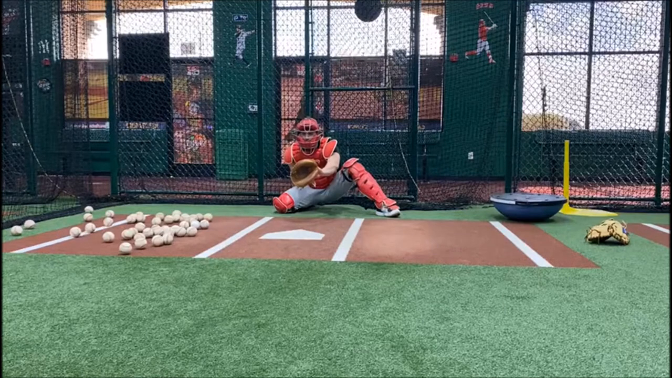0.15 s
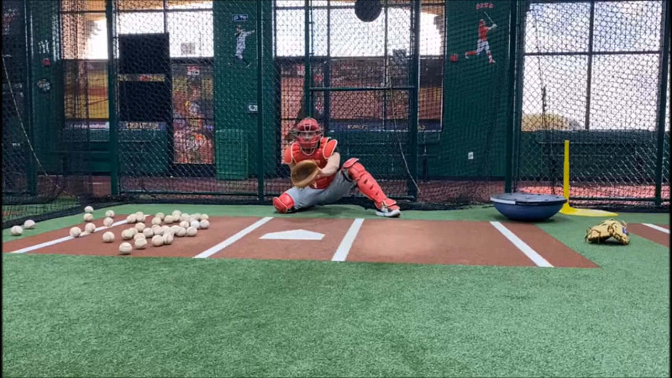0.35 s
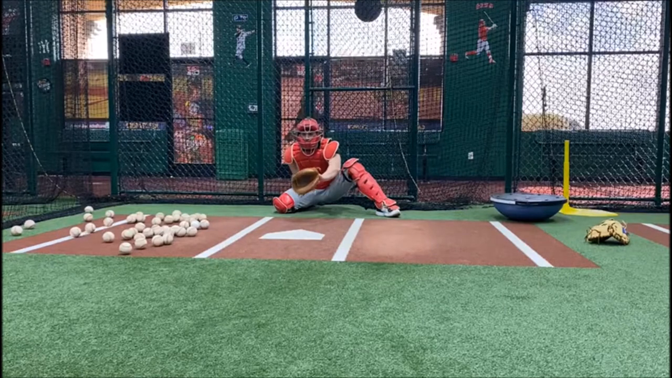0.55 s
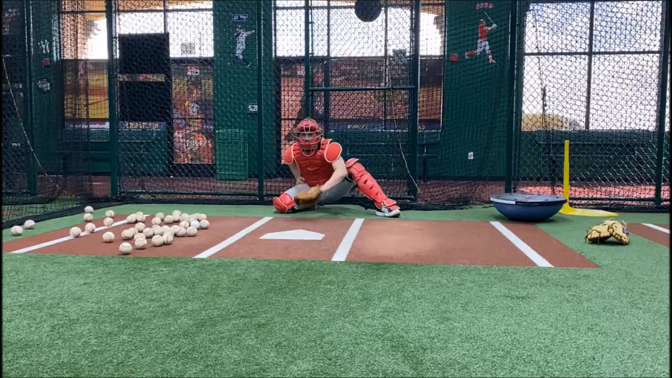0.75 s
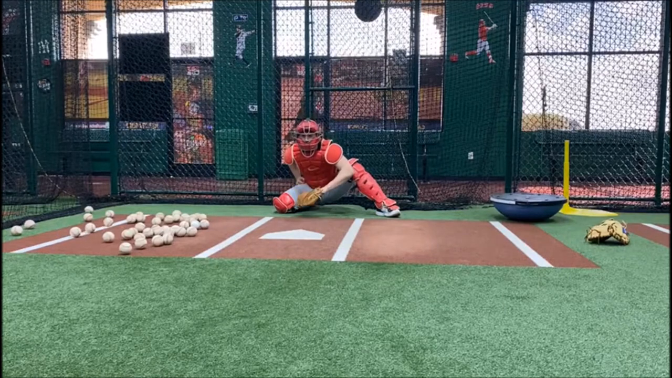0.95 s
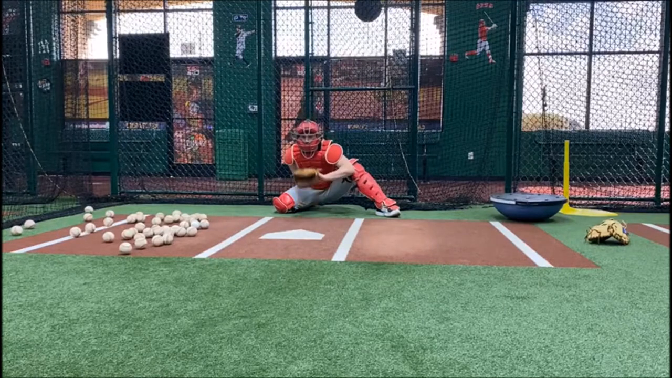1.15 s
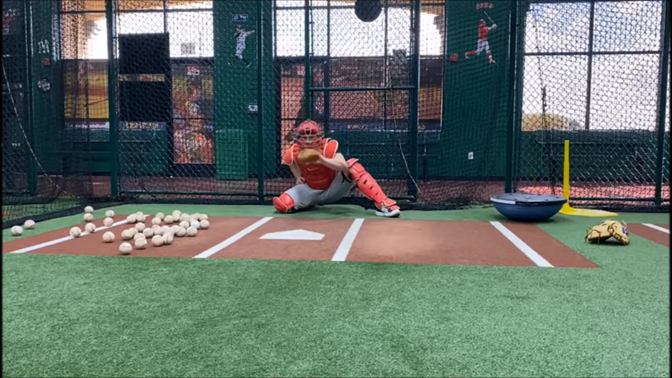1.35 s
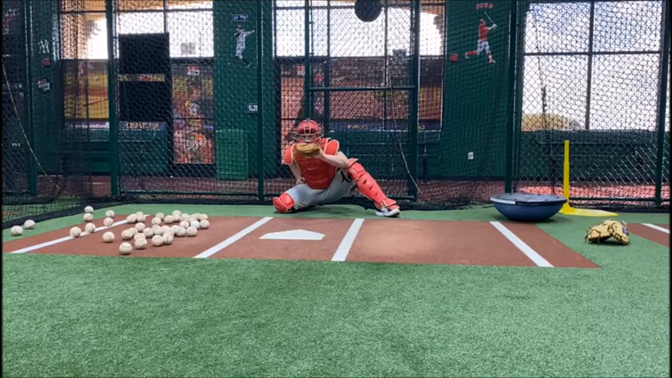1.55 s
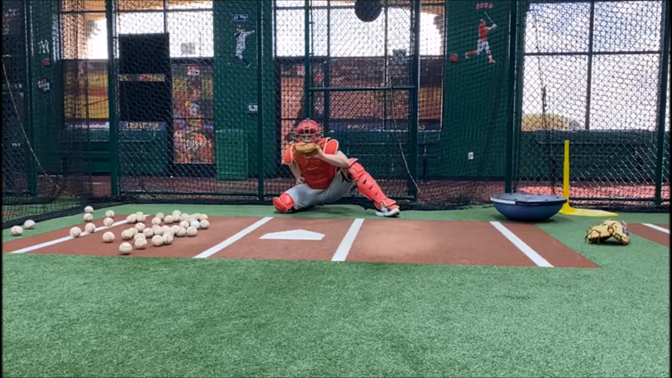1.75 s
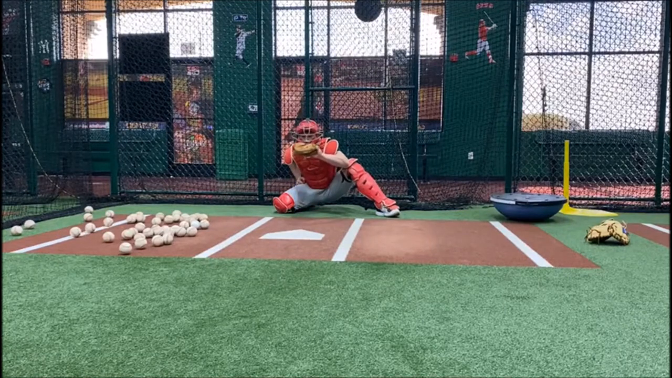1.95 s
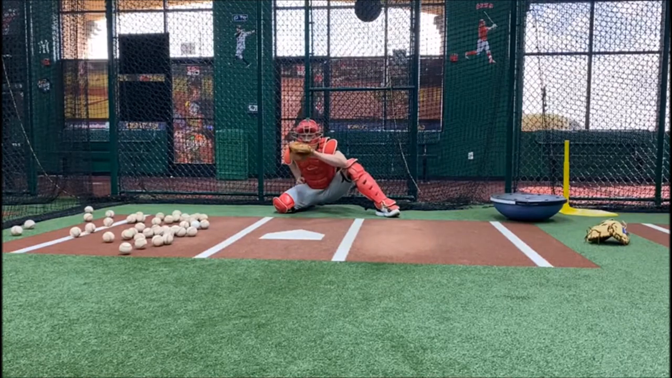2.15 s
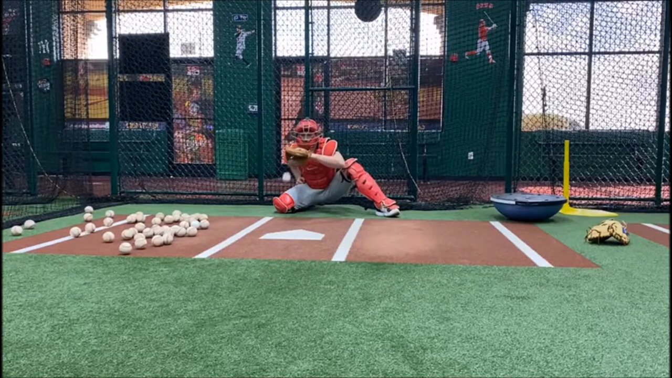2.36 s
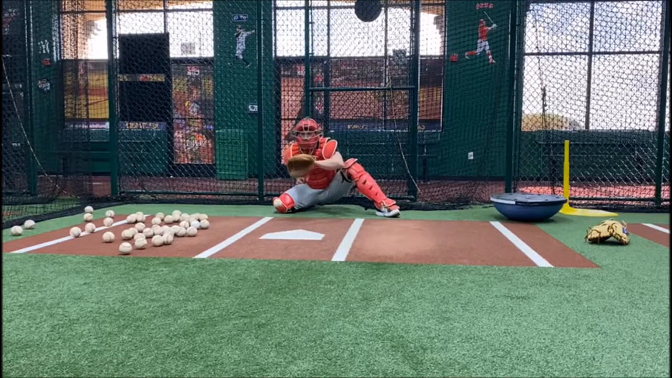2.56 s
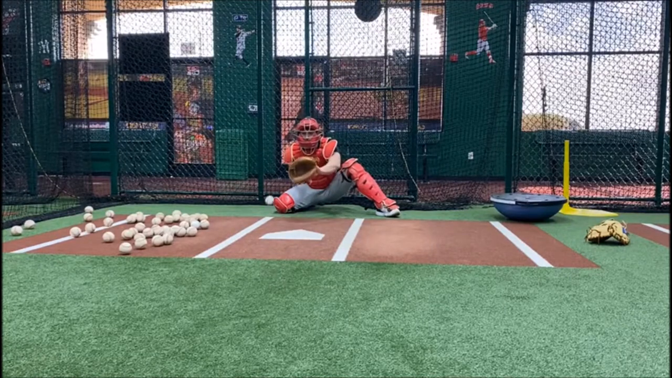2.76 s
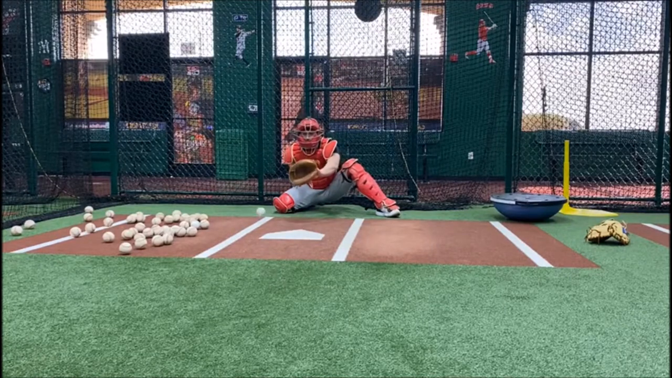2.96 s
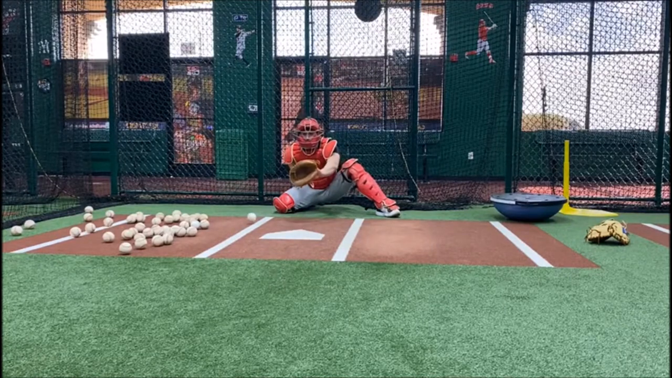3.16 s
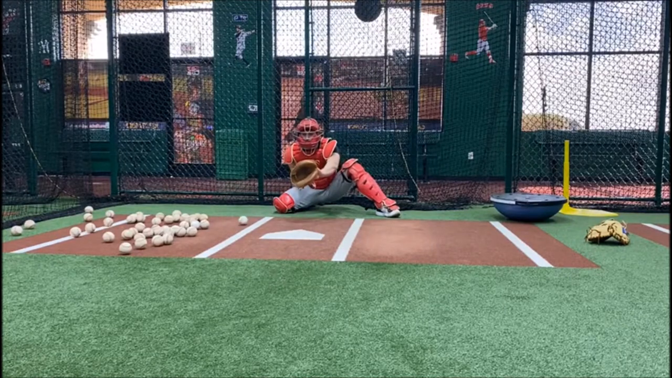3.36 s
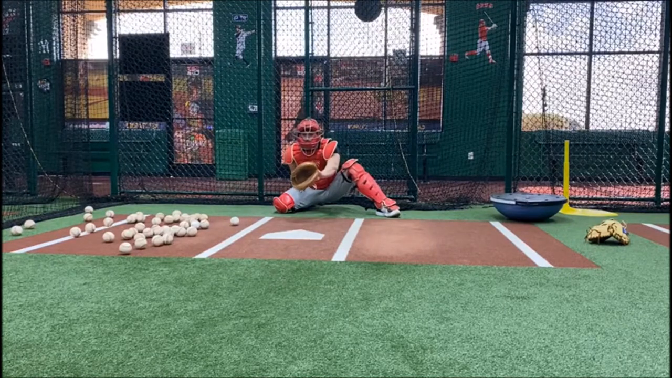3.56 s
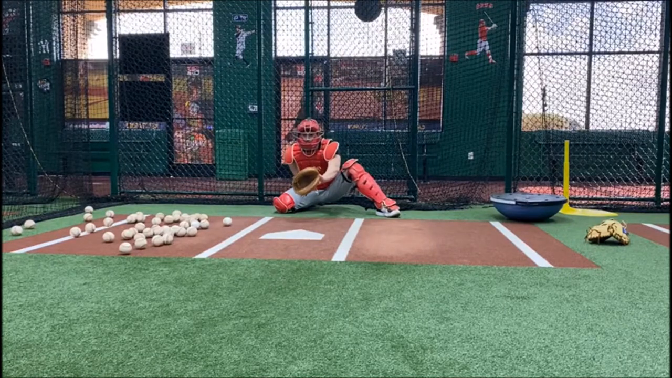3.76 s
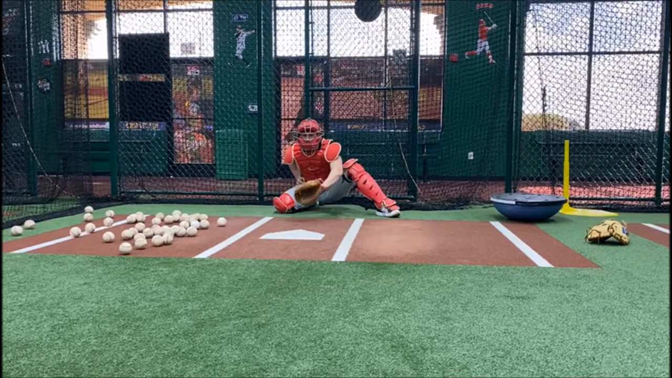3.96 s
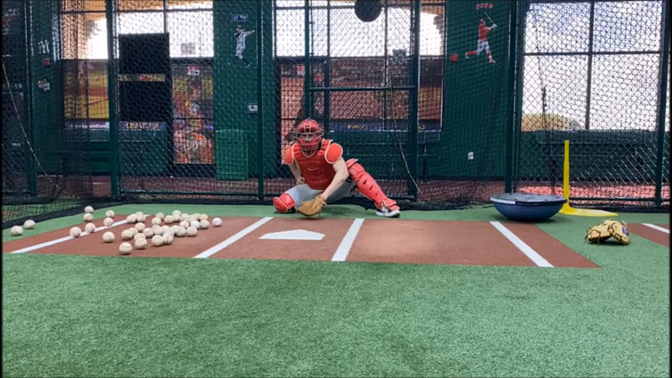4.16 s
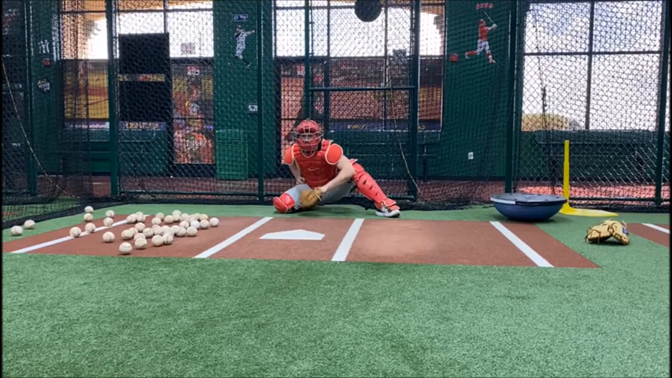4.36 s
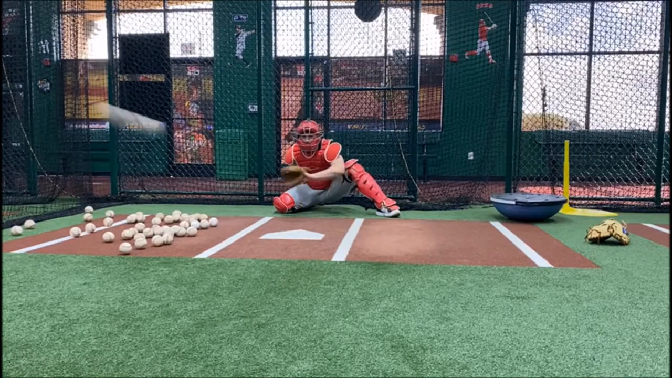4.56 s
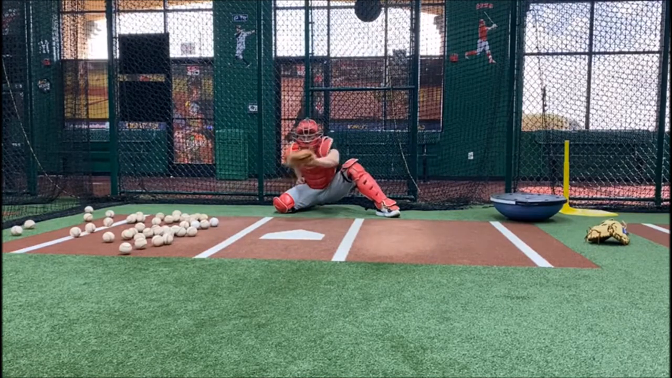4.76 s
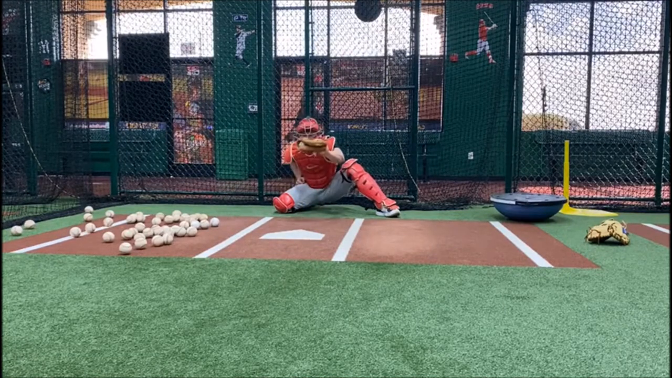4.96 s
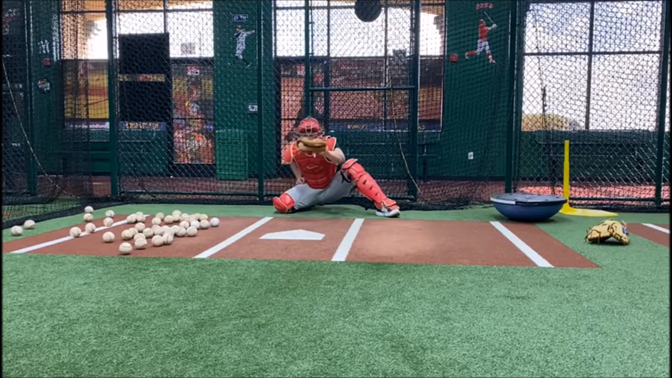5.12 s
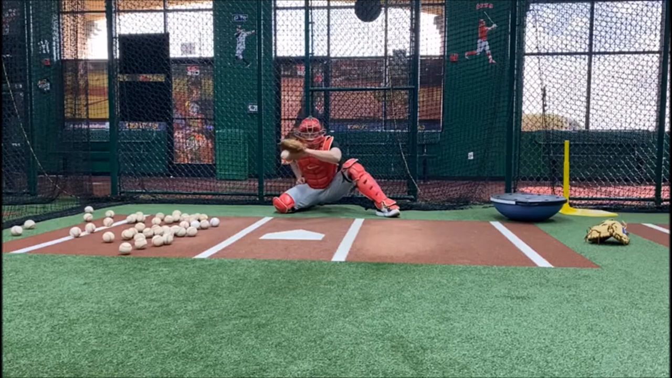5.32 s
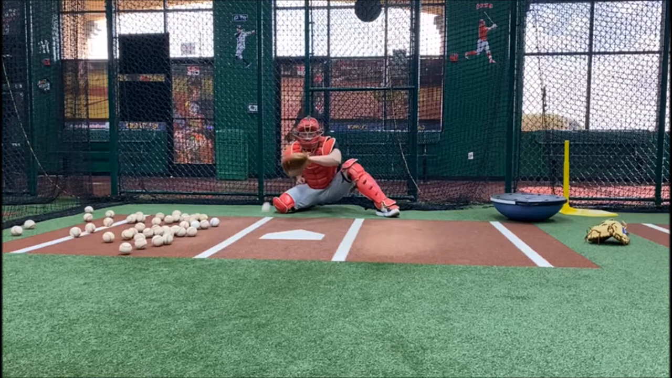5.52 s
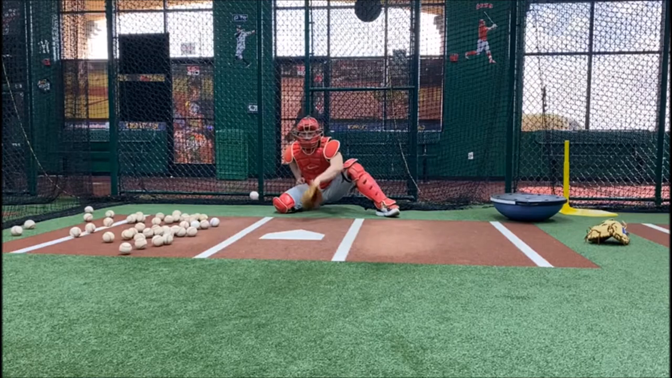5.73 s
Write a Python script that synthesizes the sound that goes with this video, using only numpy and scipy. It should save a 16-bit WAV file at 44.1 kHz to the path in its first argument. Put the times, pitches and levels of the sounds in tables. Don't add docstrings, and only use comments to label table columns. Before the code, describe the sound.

Distant launches boom and echo through a large batting hall, and two baseballs crack sharply into a nearby leather mitt over faint fan hum.

```python
import sys
import numpy as np
from scipy import signal
from scipy.fft import rfft, irfft
from scipy.io import wavfile
from scipy.ndimage import uniform_filter1d

SR = 44100
rng = np.random.default_rng(int(sys.argv[2]) if len(sys.argv) > 2 else 0)


def amplitude_ratio(level_db):
    exponent = np.asarray(level_db, float) / 20
    return 10 ** exponent


def inscribe(sig):
    pcm = np.round(np.clip(np.atleast_2d(sig).T, -1, 1) * 32767)
    wavfile.write(sys.argv[1], SR, pcm.astype(np.int16))


N = 255339

# pitch_hz, level_db (per Hz)
FAN_COLOUR = [(15, -43), (25, -36.5), (49, -1), (77, -0.5), (234, -13), (297, -17.5), (360, -18),
              (446, -21.5), (593, -19.5), (889, -27), (2250, -24.5), (2860, -32), (7400, -40.5),
              (9620, -70), (16300, -120)]
FAN_DB = -53
# pitch_hz, left_minus_right_db
FAN_BALANCE = [(25, 0), (60, 0), (110, 0.0), (190, 1.5), (350, -10.5), (630, 0), (1120, 1), (2020, -0.5),
               (3630, 2.5), (6520, 9), (11700, -2)]
# pitch_hz, level_db
HUM = [(360.7, -55), (538.3, -75.5), (597.5, -68), (721.4, -68.5), (1200, -84), (1443, -74.5)]
HUM_LOAD_S, HUM_RAMP_S, HUM_IDLE_DB = 2.83, .14, -4
# start_s, level_db, decay_s (to -60 dB)
JOLTS = [(-.02, -39, 0.77), (.405, -38, 1.65), (.915, -36, 1.3), (1.05, -42.5, .4)]
JOLT_RISE_S = .0098
WHINE_HZ, WHINE_DB, THROB_HZ = 2300, -70, 28
POST_S, POST_HZ, POST_BEAT_HZ, POST_DB, POST_DECAY_S = 1.49, 51, 4.8, -36, 1.3
# start_s, pitch_hz, level_db
SQUEAKS = [
    [(3.56, 1250, -64), (3.64, 1570, -64.5), (3.71, 1540, -66), (3.77, 1600, -71)],
    [(3.84, 2500, -65), (3.89, 2550, -60), (3.95, 2550, -63), (3.985, 2550, -58), (4.02, 2490, -57),
     (4.03, 2280, -68), (4.042, 2120, -59), (4.06, 1900, -58), (4.078, 1765, -51), (4.1, 1750, -53)],
]
SQUEAK_ECHO_S = .035
# pitch_hz, side_minus_mid_db
WIDE_PORTS = [(25, -30), (60, -21.5), (110, -19.5), (190, -10), (350, -1.5), (630, 3.5), (1120, 1.5),
              (2020, -2), (3630, -0.5), (6520, -0.5), (11700, -0.5)]
# pitch_hz, side_minus_mid_db
NEAR_PORTS = [(60, -23), (110, -31), (190, -33), (350, -20.5), (630, -16), (1120, -12), (2020, -16.5),
              (3630, -1.5), (6520, 1), (11700, -8)]
# pitch_hz, decay_s (to -60 dB)
HALL_DECAY = [(70, 1.53), (200, 1.9), (500, 1.31), (1200, 1.435), (3000, 1.55), (6000, 0.96), (10000, 0.62)]
# pitch_hz, level_db (from the last colour point)
AIR = [(8500, -4), (10000, -9), (11400, -13.5), (12100, -42.5)]
# start_s, level_db, rise_s, hold_s, decay_stretch (times the hall's)
FAR_BLOWS = [
    (-.05, -30, 0.0069, 0.11, 0.37),
    (.1142, -29, 0.00058, 0.063, 1.125),
    (0.905, -18.2, 0.022, 0.023, 0.84),
    (1.41, -41.5, 0.024, 0.31, 0.65),
    (1.561, -38.5, 0.035, 0.12, 1.07),
    (4.2265, -25.2, 0.017, 0.046, 0.8),
    (4.735, -29.5, 0.0037, 0.019, 0.94),
    (5.029, -39, 0.011, 0.055, 1.04),
    (5.625, -45.5, 0.0034, 0.045, 0.91),
]
# pitch_hz, fill_s, left_minus_right_db, treble_delay_s
GAPS = [(1000, .1, 2, .001), (1250, .07, 2.5, .0003), (3600, .075, -.9, .009), (3300, .05, .2, .003),
        (1000, .02, .6, .003), (3400, .065, 1.2, .011), (3000, .005, 1.2, .0005), (3250, .03, 1.2, .001),
        (1000, .02, -.8, .001)]
GAP_WIDTH, TREBLE_HZ = .16, 2500
# pitch_hz, level_db (per Hz)
THUD = [(24, -48), (40, -15), (181, 4.5), (562, -18.5), (747, -58), (889, -39), (1440, -32), (7400, -56),
        (9620, -89), (16300, -120)]
BAT = [(24, -42), (40, -11), (92, -5.5), (162, 1.5), (515, -9.5), (670, -2.5), (731, -13.5), (1380, -12),
       (1950, -10.5), (7400, -20.5), (9620, -56), (16300, -120)]
LAUNCH_1 = [(24, -49.5), (40, -14.5), (80, -13.5), (292, -5), (414, -5.5), (493, -7.5), (851, -8.5),
            (1110, -7), (1210, -8), (1470, -6.5), (3840, -16.5), (7400, -18.5), (9620, -51), (16300, -120)]
NET = [(41, -43.5), (70, -15.5), (80, -25), (114, -7), (269, -1), (713, -18), (2120, -10), (5310, -14.5),
       (7400, -26.5), (9620, -57), (16300, -120)]
LAUNCH_2 = [(24, -49), (40, -12), (145, -6), (405, -4), (442, -17), (575, -3), (851, -9.5), (1110, -6.5),
            (1210, -9.5), (1380, -7.5), (3600, -18), (7400, -19.5), (9620, -51), (16300, -120)]
MITT_TAIL = [(24, -37), (40, -21), (71, -4), (220, -1.5), (256, -3), (575, -6.5), (2000, -12.5),
             (5690, -21), (7400, -22), (9620, -58), (16300, -120)]
RATTLE = [(24, -54), (40, -30), (75, -21), (452, -4), (797, -15), (971, -15), (1260, -11.5), (2130, -6.5),
          (4290, -14), (7400, -30), (9620, -60), (16300, -120)]
DROP = [(24, -27), (40, 0), (326, -8), (355, -10), (731, -27), (780, -30), (833, -26.5), (2330, -17),
        (7400, -26), (9620, -58), (16300, -120)]
# start_s, pitch_hz, level_db, hold_s, decay_s
RINGS = [(-.02, 186, -51, 0.13, 0.6), (0.553, 183, -50.5, 0.35, 0.27), (0.501, 380, -50.5, 0.34, 0.43),
         (.88, 198, -34.5, 0.045, 0.31), (0.9045, 1512, -28, 0.05, 0.28), (0.978, 1110, -27, 0.0086, 0.47),
         (0.932, 512, -28, 0.056, 1.3), (4.23, 1380, -30, 0.015, 0.78), (4.232, 2040, -36, 0.041, 0.32),
         (4.261, 436, -36, 0.23, 1.3), (4.739, 810, -27, 0.0067, 0.25), (5.067, 920, -50.5, 0.047, 0.425),
         (.913, 5800, -31, .06, .35), (4.238, 5800, -36, .06, .3)]
# start_s, pitch_hz, level_db, hold_s, decay_s
MORE_RINGS = [(.91, 800, -30, .04, .3), (.97, 275, -34, .1, .6), (2.546, 330, -47, .01, .35),
              (2.546, 480, -56, .005, .2), (4.3, 520, -39, .08, .7), (4.76, 760, -37, .03, .2),
              (5.618, 320, -46, .01, .4), (5.618, 480, -51, .005, .2)]
RING_SPREAD = .14
# start_s, peak_db, pitch_hz, cycles
ECHOES = [(.062, -26, 185, 6), (.115, -25, 650, 3), (.133, -25, 600, 4), (.147, -30, 1900, 8),
          (.188, -28, 2050, 8), (.221, -29, 1850, 10), (.323, -33, 600, 5), (.907, -24, 1340, 6),
          (.912, -19, 1850, 6), (.925, -16, 1150, 9), (.935, -17, 1420, 9), (.972, -19, 1500, 16),
          (.984, -19, 520, 3), (.986, -17, 1130, 16), (.996, -22, 520, 5), (1.003, -22, 2950, 8),
          (1.048, -25, 560, 7), (1.058, -20, 520, 2), (1.501, -37, 912, 4), (1.6, -35, 221, 2),
          (1.665, -31, 245, 2), (1.537, -36, 1600, 3), (4.07, -57, 2450, 20), (4.229, -35, 1370, 6),
          (4.247, -29, 2250, 14), (4.262, -26, 2300, 12), (4.266, -23, 1200, 9), (4.271, -24, 450, 2),
          (4.304, -24, 1600, 10), (4.313, -22, 1250, 8), (4.316, -26, 580, 7), (4.348, -27, 420, 6),
          (4.448, -27, 1360, 5), (4.862, -26, 420, 4), (4.89, -27, 620, 5), (4.924, -28, 480, 3),
          (5.026, -33, 544, 1.5), (5.031, -33, 2330, 4), (5.076, -30, 380, 5), (5.11, -33, 400, 3),
          (5.078, -36, 2300, 8), (5.278, -38, 1900, 10)]
# start_s, peak_db, pitch_hz, cycles
KNOCKS = [(0.05, -25.5, 255, 4.3), (0.189, -23, 700, 3), (0.209, -23, 660, 6.5), (1.369, -25, 440, 1),
          (1.392, -26.5, 243, 2.4), (1.432, -30.5, 387, 1.8), (1.531, -37, 1086, 9.24),
          (1.567, -33, 418, 3.3), (1.645, -32.5, 282, 2.4), (2.545, -30, 271, 1.34),
          (2.932, -41, 319, 1.37), (4.757, -12.5, 577, 1.9), (4.766, -25.5, 574, 3.8), (4.8, -45, 145, 2.1),
          (4.856, -23.5, 630, 5.1), (4.895, -21, 527, 2), (4.923, -32, 227, 4.1), (4.973, -26, 377, 2.2),
          (4.998, -31.5, 316, 0.88), (5.617, -29, 266, 1.96)]
# start_s, peak_db, pitch_hz, cycles
TICKS = [(.914, -28, 1570, 2.7), (.918, -12, 1420, 9), (.938, -14, 1120, 7), (.984, -13, 1070, 3.5),
         (.994, -17, 1164, 6.9), (1.002, -15, 1050, 2), (4.237, -21, 1440, 8.3), (4.263, -22, 1250, 5.7),
         (4.273, -20, 1230, 3.1), (4.751, -19, 990, 4.1), (4.79, -23, 900, 4), (4.815, -34, 707, 3.3),
         (.115, -26, 2100, 6), (.123, -24, 2250, 11), (1.388, -39, 5970, 5), (1.426, -32, 3080, 2.7),
         (1.47, -29, 5700, 4), (1.584, -25, 5670, 3), (1.665, -29, 2570, 4), (2.545, -47.5, 2930, 2.7),
         (4.7343, -27, 4730, 3), (4.7315, -14.5, 675, 1.7), (5.032, -35, 4400, 4.4), (5.62, -40, 2160, 4.5)]
# start_s, peak_db, pitch_hz, cycles
GEAR = [(.058, -24, 179.5, 8), (.114, -26, 10200, 7), (.124, -27, 10200, 15), (.152, -25, 7000, 6),
        (.438, -32, 2070, 8), (1.381, -24, 76, 2.8), (1.426, -38, 9600, 8), (1.479, -31, 6000, 2.5),
        (4.7232, -20, 850, 2.1), (4.7345, -28.5, 10400, 8), (4.738, -16.5, 227, 1.1),
        (4.768, -22, 910, 1.5), (5.031, -43, 7500, 3.6), (5.075, -35, 990, 8.6)]
# start_s, rasp_db, swell_s, afterglow (0-1), snap_db
CRACKS = [
    (1.4, -12.5, 0.0015, 0, -2),
    (4.7269, -10, 0.0015, 0.29, -21.5),
]
# pitch_hz, level_db (per Hz)
CRACK_COLOURS = [
    [(590, -34.5), (1000, 4.5), (5160, -8.5), (6360, 4), (7680, -13), (9870, 2), (12200, -29.5),
     (15800, -51.5), (22000, -120)],
    [(590, -22), (900, 2), (1400, -7.5), (2200, 6), (4950, -14.5), (6770, -5), (8170, -23.5), (9460, -4.5),
     (12200, -30.5), (22000, -120)],
]
CRACK_LEAD_S, TURF_ECHO_S = .008, .0005
# start_s, peak_db, pitch_hz (at the start), glide_s, fade_s
THUMPS = [
    (1.4008, -9.2, 760, .00112, .012),
    (4.7266, -4.2, 940, .00131, .0082),
]
THUMP_STEEP = 2.1
# pitch_hz, share (0-1 of the time)
MID_DROPS = [(600, 0), (1000, .008), (2600, .008), (2800, .14), (3100, .04), (3900, .18), (4400, .12),
             (4900, .02), (6900, .06), (7700, .55), (8200, .98), (8900, .98), (9200, .2), (10900, .25),
             (11300, .98)]
# pitch_hz, share (0-1 of the time)
SIDE_DROPS = [(1500, 0), (2500, .02), (6000, .02), (7000, .25), (8000, .2), (8900, .3), (9400, .98),
              (10800, .98), (11100, .5), (11700, .6), (12000, .98)]


def shape(x, points):
    hz, db = np.transpose(points)
    axis_hz = np.log(np.fft.rfftfreq(x.shape[-1], 1 / SR) + 1)
    return irfft(rfft(x) * amplitude_ratio(np.interp(axis_hz, np.log(hz), db)), x.shape[-1])


def unit(x):
    return x / np.sqrt(np.mean(x ** 2))


def ports(mid, side, points):
    side = shape(side, points)
    return np.array([mid + side, mid - side])


def walk(rate, size):
    k = int(SR / rate)
    steps = np.repeat(rng.standard_normal(size // k + 1), k)
    return 1.42 * uniform_filter1d(uniform_filter1d(steps, k), k)[:size]


def add(out, s, x):
    i = int(s * SR)
    a, b = max(i, 0), min(i + x.shape[-1], N)
    out[..., a:b] += x[..., a - i:b - i]


def aired(colour):
    *body, last = colour[:-2]
    return body + [last] + [(hz, last[1] + db) for hz, db in AIR]


def fan():
    noise = shape(rng.standard_normal((2, N)), aired(FAN_COLOUR))
    return ports(*noise / np.std(noise[0]), WIDE_PORTS) * amplitude_ratio(FAN_DB + .8 * walk(3.2, N))


def mains_hum():
    t = np.arange(N) / SR
    swell_db = HUM_IDLE_DB * np.clip(.5 - (t - HUM_LOAD_S) / HUM_RAMP_S, 0, 1)
    lag = np.array([[.6], [-.6]])
    out = 0
    for hz, db in HUM:
        gain = np.sqrt(2) * amplitude_ratio(db + swell_db * hz / 360 + .51 * walk(5.5, N))
        out = out + gain * np.sin(2 * np.pi * hz * t + .22 * walk(3.7, N) + lag)
    return out


def slab_rumble():
    level, t = 0, np.arange(N) / SR
    for s, db, decay_s in JOLTS:
        age = np.maximum(t - s, 0)
        level = level + (1 - np.exp(-age / JOLT_RISE_S)) * amplitude_ratio(db - 60 * age / decay_s)
    noise = shape(rng.standard_normal(N), [(30, -33.5), (55, 14.5), (80, 19.5), (130, -10.5), (220, -34)])
    return unit(noise) * level


def hall_floor():
    left, right = fan() + mains_hum()
    left = shape(left, [(hz, db / 2) for hz, db in FAN_BALANCE])
    right = shape(right, [(hz, -db / 2) for hz, db in FAN_BALANCE])
    return np.array([left, right]) + slab_rumble()


def whine():
    colour = [(WHINE_HZ * ratio, db) for ratio, db in ((.85, -40), (.97, -6), (1, 0), (1.03, -6), (1.15, -40))]
    noise = shape(rng.standard_normal((2, N)), colour)
    throb = .5 + .5 * np.sin(2 * np.pi * np.cumsum(THROB_HZ * (1 + .06 * walk(5, N))) / SR)
    return unit(noise) * throb * amplitude_ratio(WHINE_DB + 2.5 * walk(1.5, N))


def post():
    age = np.maximum(np.arange(N) / SR - POST_S, 0)
    phase = 2 * np.pi * np.cumsum(POST_HZ * (1 + .015 * walk(41, N))) / SR
    fade = amplitude_ratio(POST_DB - 60 * age / POST_DECAY_S + .64 * walk(50.2, N))
    return np.sqrt(2) * np.sin(np.pi * POST_BEAT_HZ * age) * fade * np.sin(phase)


def curve(table):
    s, hz, db = np.transpose(table)
    t = np.arange(N) / SR
    gate = np.clip(np.minimum(t - s[0], s[-1] - t) / .025, 0, 1)
    return np.interp(t, s, hz), gate * amplitude_ratio(np.interp(t, s, db))


def tone(table, wobble, lag, patchy_db):
    hz, gain = curve(table)
    phase = 2 * np.pi * np.cumsum(hz * (1 + wobble * walk(41, N))) / SR
    return np.sqrt(2) * gain * amplitude_ratio(patchy_db * walk(50, N)) * np.sin(phase + np.array([[lag], [-lag]]))


def squeak(dry_db=-4, wet_db=-5, decay_s=.4):
    direct = sum(tone(part, .012, .6, 3.5) for part in SQUEAKS)
    t = np.arange(2 ** 14) / SR
    tail = rng.standard_normal((2, len(t))) * amplitude_ratio(-60 * t / decay_s) * np.clip(t / SQUEAK_ECHO_S, 0, 1) ** 2
    tail = tail / np.sqrt(np.sum(tail[0] ** 2))
    echo = signal.fftconvolve(direct, tail, axes=1)[:, :N]
    return amplitude_ratio(dry_db) * direct + amplitude_ratio(wet_db) * echo


def far_blow(colour, db, rise, hold, stretch, size=2 ** 16):
    t = np.arange(size) / SR
    noise = shape(rng.standard_normal((2, size)), aired(colour))
    spectrum = rfft(ports(*noise / np.std(noise[0]), WIDE_PORTS))
    centres = np.log([hz for hz, _ in HALL_DECAY])
    axis_hz = np.log(np.fft.rfftfreq(size, 1 / SR) + 1)
    out = 0
    for k, (_, decay_s) in enumerate(HALL_DECAY):
        share = np.interp(axis_hz, centres, np.arange(len(HALL_DECAY)) == k)
        fade = amplitude_ratio(-60 * np.maximum(t - hold - rise, 0) / (decay_s * stretch))
        out = out + irfft(spectrum * share, size) * fade
    clumps_db = 1.5 * walk(120, size) * np.exp(-t / .25)
    return out * (1 - np.exp(-t / max(rise, 1e-4))) * amplitude_ratio(db + clumps_db)


def gapped(x, hz, fill, pan_db, late):
    t = np.arange(x.shape[-1]) / SR
    edges = ((-GAP_WIDTH, -30), (-GAP_WIDTH / 2, -2), (GAP_WIDTH / 2, -2), (GAP_WIDTH, -30))
    band = shape(x, [(hz * (1 + offset), db) for offset, db in edges])
    x = x - band * np.exp(-(t / fill) ** 2)
    treble = shape(x, [(TREBLE_HZ * .8, -30), (TREBLE_HZ, 0)])
    x = x - treble * np.exp(-(t / late) ** 2)
    return x * (t < 1.4) * amplitude_ratio(pan_db * np.array([[.5], [-.5]]))


def far_ring(hz, db, hold, decay_s, size=2 ** 15):
    width = RING_SPREAD * hz / np.sqrt(decay_s)
    t, rise = np.arange(size) / SR, 1.2 / width
    colour = [(hz / 2, -45), (hz - width, -7), (hz, 0), (hz + width, -7), (2 * hz, -45)]
    noise = shape(rng.standard_normal((2, size)), colour)
    fade_db = -60 * np.maximum(t - hold - rise, 0) / decay_s
    return ports(*noise / np.std(noise[0]), WIDE_PORTS) * (1 - np.exp(-t / rise)) * amplitude_ratio(db + fade_db)


def knocks(table, rough, spread_db):
    out, t = np.zeros((2, N)), np.arange(4096) / SR
    for s, db, hz, cycles in table:
        age = t * hz / cycles * 4
        swell = (age / 2) ** 2 * np.exp(2 - age)
        colour = [(hz / 3, -25), (hz, 0), (1.6 * hz, -8), (5 * hz, -45)]
        grit = unit(shape(rng.standard_normal((2, len(t))), colour))
        pan = amplitude_ratio(spread_db * rng.standard_normal() * np.array([[.5], [-.5]]))
        add(out, s, amplitude_ratio(db) * swell * pan * (np.sin(2 * np.pi * hz * t) + rough * grit))
    return out


def thump(db, hz, glide, fade):
    t = np.arange(2 ** 12) / SR
    phase = 2 * np.pi * hz * glide * np.log(1 + t / glide)
    return -np.sin(phase) * amplitude_ratio(db) * np.exp(-(t / fade) ** THUMP_STEEP)


def crack(colour, rasp_db, swell_s, glow, snap_db):
    t = np.arange(2 ** 12) / SR - CRACK_LEAD_S
    before = np.exp(t / swell_s) * np.clip(3.6 + t / swell_s, 0, 1)
    after = np.exp(-t / .00019) + glow * np.exp(-t / .0036)
    rasp = shape(rng.standard_normal((2, len(t))), colour)
    rasp = ports(*rasp / np.std(rasp[0]), NEAR_PORTS) * np.where(t < 0, before, after) * amplitude_ratio(rasp_db)
    lag = np.array([[0], [.00005]])
    snap = 0
    for shift_s, size in ((TURF_ECHO_S, 1), (0, .85)):
        snap = snap + size * np.exp(-((t + shift_s - lag) / .000028) ** 2)
    snap = shape(snap, [(600, -33.5), (1800, 6.5), (6000, 6.5), (10500, 1.5), (12500, -21)])
    return rasp - snap * amplitude_ratio(snap_db)


def scene():
    out = hall_floor() + whine() + post() + squeak()
    colours = THUD, BAT, LAUNCH_1, NET, NET, LAUNCH_2, MITT_TAIL, RATTLE, DROP
    for (s, *blow), colour, gap in zip(FAR_BLOWS, colours, GAPS):
        add(out, s, gapped(far_blow(colour, *blow), *gap))
    for s, *ring in [*RINGS, *MORE_RINGS]:
        add(out, s, far_ring(*ring))
    out = out + knocks(ECHOES, .4, 3) + knocks(KNOCKS, .29, 1.357)
    out = out + knocks(TICKS, .449, 3) + knocks(GEAR, .31, 1.2)
    for s, *air in THUMPS:
        add(out, s, thump(*air))
    for (s, *leather), colour in zip(CRACKS, CRACK_COLOURS):
        add(out, s - CRACK_LEAD_S, crack(colour, *leather))
    return out


def dropouts(x, table, size=1024, count=128):
    hz, _, z = signal.stft(x, SR, nperseg=size)
    treble = np.sum(np.abs(z[hz > 2000]) ** 2, axis=0) + 1e-12
    jump = np.diff(np.log10(treble), prepend=0) > .6
    blow = uniform_filter1d(jump * 1., size=3) > 0
    chance = np.repeat(rng.random((count, z.shape[1] // 4 + 1)), 4, axis=1)
    chance = np.repeat(chance, len(hz) // count + 1, axis=0)
    share = np.interp(hz, *np.transpose(table))[:, None]
    loud_middle = (hz[:, None] < 6500) & (treble > 4 * np.median(treble))
    share = np.where(loud_middle, 0, share)
    keep = (chance[:len(hz), :z.shape[1]] > share) | blow
    return signal.istft(z * keep, SR, nperseg=size)[1][:N]


def low_pass(x):
    return signal.sosfilt(signal.butter(12, 12310, fs=SR, output="sos"), x)


def record(dry):
    rounded = np.tanh(1.01 * dry) / 1.164
    left, right = shape(rounded, [(11800, 0), (12300, -8), (12900, -40)])
    mid = dropouts((left + right) / 2, MID_DROPS)
    side = dropouts((left - right) / 2, SIDE_DROPS)
    return low_pass(np.array([mid + side, mid - side]))


dry = scene()
out = record(dry)
inscribe(out)
```